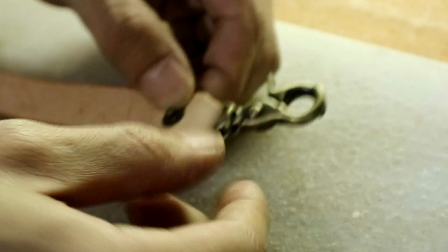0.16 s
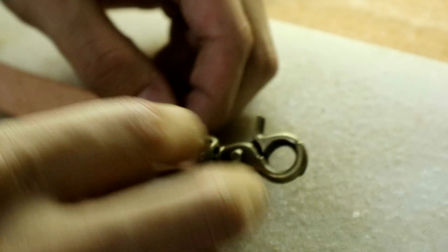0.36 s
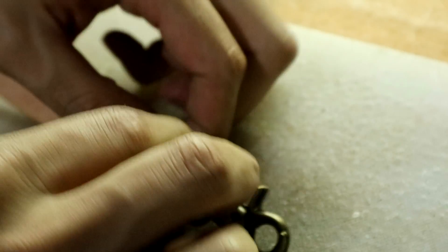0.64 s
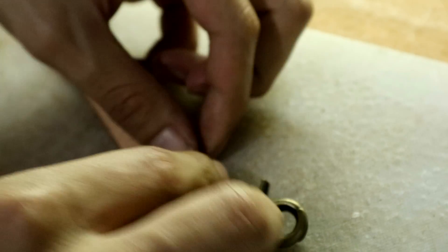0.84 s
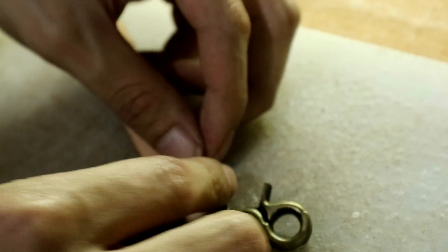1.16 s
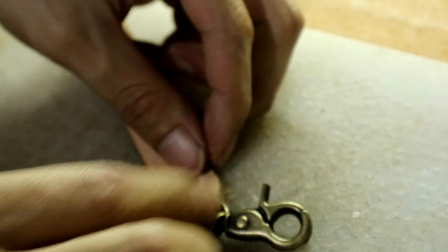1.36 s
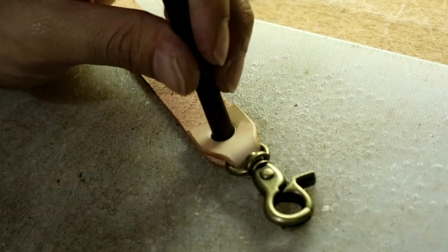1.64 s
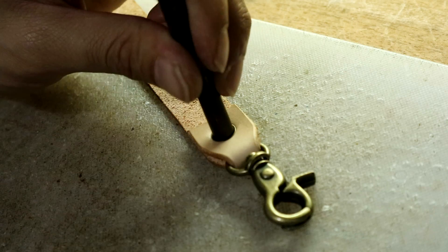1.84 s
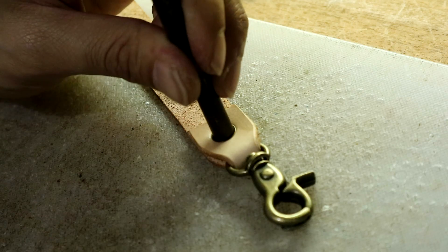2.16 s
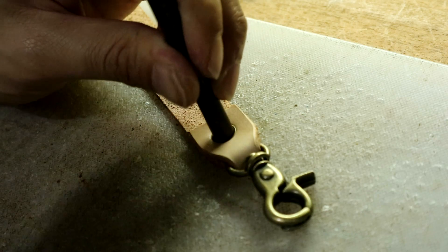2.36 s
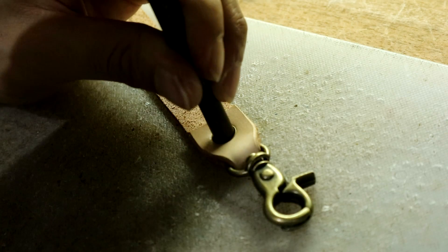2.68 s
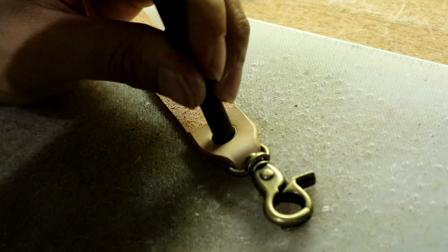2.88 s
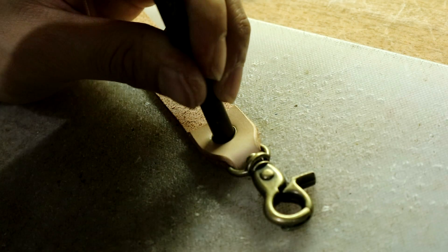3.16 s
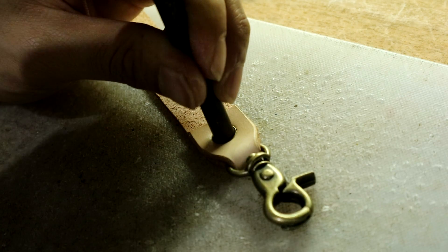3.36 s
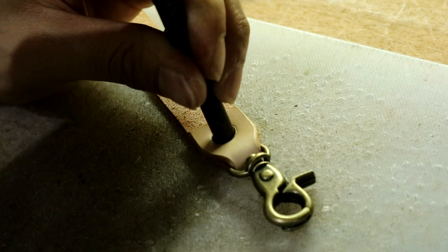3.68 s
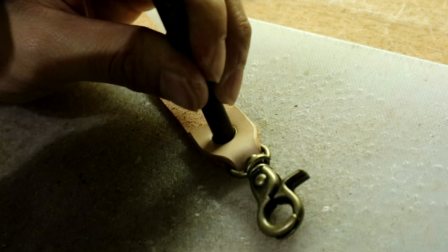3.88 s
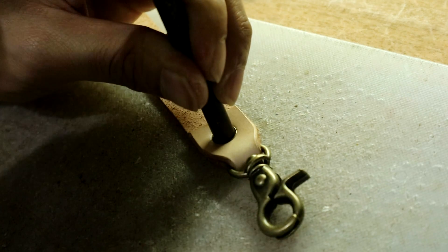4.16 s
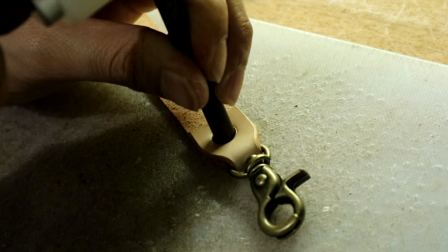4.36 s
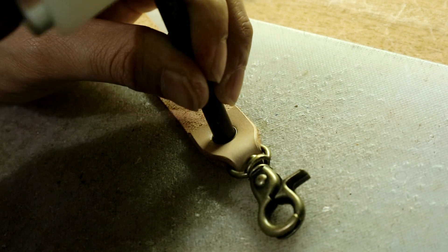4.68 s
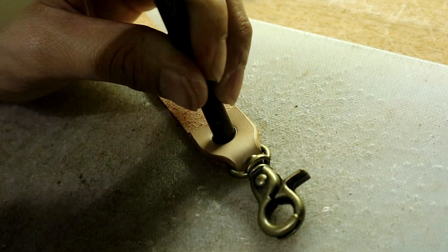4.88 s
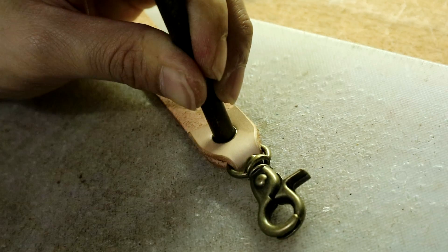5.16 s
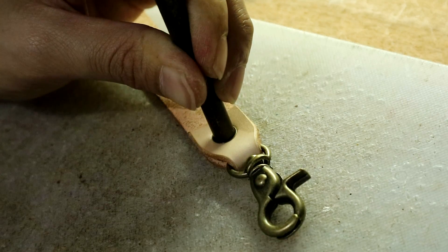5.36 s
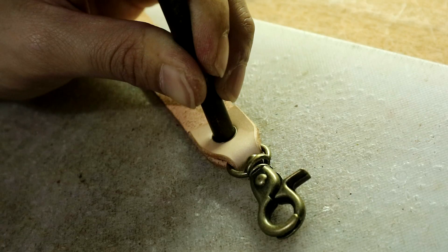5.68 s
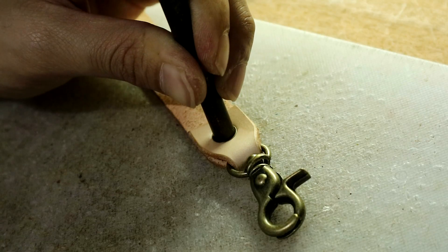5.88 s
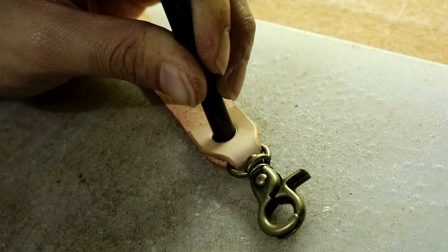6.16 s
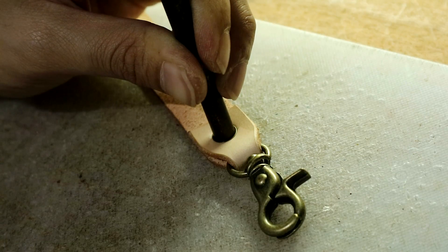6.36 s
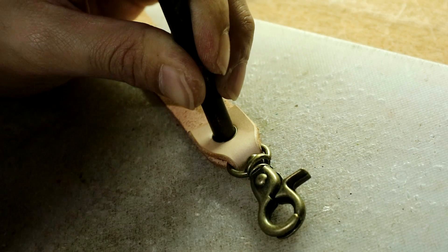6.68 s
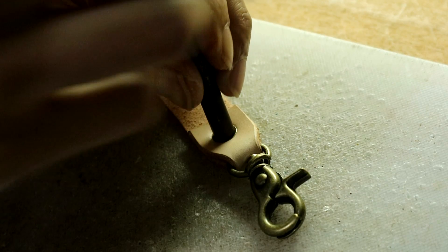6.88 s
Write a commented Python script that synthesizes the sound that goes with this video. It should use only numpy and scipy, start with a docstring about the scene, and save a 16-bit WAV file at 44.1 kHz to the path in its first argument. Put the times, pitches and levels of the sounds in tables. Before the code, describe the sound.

Close stereo camera microphones catch soft leather handling, small hook clinks and one crisp rivet snap, with quick faint focus ticking and a few tiny squeaks over low room air. Three evenly spaced, short, hard mallet blows on steel follow, loud enough to overload, echoing in the workshop. Two duller, rattling wooden thuds come as the mallet is laid on the bench, the second heavier, and hands rustle to the end.

```python
"""Reverberant workshop: a rivet snaps into a leather strap on a cutting board, a mallet strikes a steel
setter three times, then is laid on the wooden bench with two bouncing thuds. Contacts ring decaying modes
and spray short hiss into reflections and a room tail; a hook clinks, squeaks are runs of slips, hands rustle
as lumpy noise, a focus motor ticks, air and hums lie below. Two close microphones on a camera overload on
the blows; gain control recovers slowly."""
import sys
import numpy as np
from scipy import signal
from scipy.io import wavfile

SR = 44100
rng = np.random.default_rng(int(sys.argv[2]) if len(sys.argv) > 2 else 0)


def digitize_waveform(pressure):
    """Quantize a signal to 16-bit integers and store it at the path in sys.argv[1].

    Rows of a 2-D input are taken as channels; values are limited to [-1, 1].
    """
    field = np.atleast_2d(pressure).T
    bounded = np.clip(field, -1, 1)
    quanta = np.round(bounded * 32767).astype(np.int16)
    wavfile.write(sys.argv[1], SR, quanta)


N = 309493

# Room tone density: f/Hz, relative level/dB per Hz
AIR_SPECTRUM = [(15, -57), (25, -26), (113, -5.5), (173, 4), (198, -0.5), (349, 1.5), (378, -1),
                (762, -4.5), (1950, -14), (2420, -15.5), (2770, -18.5), (3090, -18), (10600, -32),
                (15500, -59)]
AIR_LEVEL_DB = -56.5
# Room tone left-right likeness: f/Hz, likeness (-1..1)
AIR_LIKENESS = [(60, 1), (180, -0.9), (550, -0.67), (1650, 0.12), (4970, -0.35), (15000, -0.53)]
# Hums that swell and fade: middle t/s, half length/s, f/Hz, level/dB
HUMS = [(.1, .3, 107, -68), (0.697, 0.27, 108, -62.5), (1.4, 0.14, 103, -74), (2.75, .13, 66, -74),
        (5.2, 0.28, 105, -67.5), (5.45, 0.23, 68, -66.5), (5.55, 0.27, 168, -61.5), (6.602, .5, 66, -66.5),
        (6.75, 0.35, 160, -60.5)]
# Hands and leather sliding, one list per stretch: t/s, level/dB
RUSTLE_LEVELS = [
    [(0, -63.5), (.45, -67.5), (.61, -51), (.79, -49), (.83, -39.5), (.9, -50.5), (1.25, -59), (1.38, -52),
     (1.49, -51), (1.53, -47), (1.59, -47)],
    [(2.82, -80), (2.93, -67.5), (3.03, -88)],
    [(5.4, -60), (5.55, -59), (5.65, -53)],
    [(6.3, -50), (6.6, -46.5), (6.84, -48.5), (7.02, -48.5)],
]
# Treble lift of each stretch: lift/dB
RUSTLE_TREBLE_LIFT_DB = [-3.5, 16, -8, -4.5]
# Rustle density: f/Hz, relative level/dB per Hz
RUSTLE_SPECTRUM = [(40, -45), (70, -52), (105, 0.5), (150, -9.5), (260, 1), (500, -2), (800, -3.5),
                   (1300, -9), (3000, -18.5), (5000, -20), (15000, -53.5)]
# Focus motor runs: first step t/s, end t/s, level/dB
MOTOR_RUNS = [(.0467, .53, -56.5), (.9267, 1.42, -57.5), (1.687, 2.78, -56), (3.247, 3.26, -54)]
STEP_S, LEAD_S, LEAD_DB, STEP_SPREAD_DB = 0.12, 0.039, -3.5, 3   # a weaker tick leads each step
# Motor modes: f/Hz, level/dB, t60/s
MOTOR_MODES = [(3025, 7.5, 0.031), (3620, 8, .008), (4330, 6.5, 0.026)]
# Snap hook clinks: t/s, level/dB
HOOK_CLINKS = [(0.0114, -55), (0.1665, -70), (0.3566, -69), (0.7277, -64), (0.7711, -59), (0.8248, -50.5),
               (0.8759, -64), (1.3087, -53), (1.325, -56), (1.345, -61), (2.9002, -68), (2.9254, -62.5)]
# Hook modes: f/Hz, level/dB, t60/s
HOOK_MODES = [(4460, 6, .012), (6670, 5, 0.0121), (8400, 5.5, 0.044), (9000, -4.5, 0.017),
              (9570, -7, 0.019), (11500, -11, .015)]
# Rivet cap snapping on, small knocks on the strap: t/s, level/dB, contact cut-off f/Hz
RIVET_SNAPS = [(0.6196, -8.5, 3040), (.648, -21.5, 1637), (.812, -35, 2000), (0.8244, -26, 2500),
               (2.926, -42.5, 2950)]
# Strap-on-board modes: f/Hz, level/dB, t60/s
STRAP_MODES = [(321.8, -14, 0.05), (767, 0, 0.036), (1105, 6.5, 0.012), (1326, 11, 0.0067),
               (1960, 2.5, 0.014), (2500, -2, 0.0067), (2990, -7, 0.0098), (3430, -3, .012),
               (4124, 5.5, 0.0048)]
# Faint squeaks: t/s, length/s, strongest slip level/dB
SQUEAK_RUNS = [(2.005, 0.049, -57.5), (2.264, 0.057, -59.5), (2.904, .085, -63), (4.972, 0.0039, -45)]
SLIP_GAP_S = 0.007   # mean
# Squeak modes: f/Hz, level/dB, t60/s
SQUEAK_MODES = [(2250, -4.5, .02), (2400, -1, .03), (2460, -3.5, 0.023), (4500, -13, 0.018)]
# Three mallet blows (first three rows); a light bounce after the second and after the third:
# t/s, level/dB, contact cut-off f/Hz
MALLET_BLOWS = [(3.4268, 4.5, 4500), (3.8021, 7.5, 4000), (4.2253, 8, 3600), (3.832, -15, 3000),
                (4.266, -16.5, 6000)]
# Setter and board modes: f/Hz, level/dB, t60/s
SETTER_MODES = [(150, -16, 0.067), (268, -8, 0.045), (370, -6, 0.021), (540.3, -10.5, 0.027),
                (805, -5.5, 0.018), (977, -5.5, 0.012), (1194, -3.5, 0.017), (1425, -3.5, 0.014),
                (1715, 0, .014), (2244, -6.5, 0.02), (2717, -8, 0.01), (3200, -15, 0.016),
                (4006, -17, 0.018), (5300, -11, .003)]
# Mallet laid down: t/s, level/dB, contact cut-off f/Hz, spray level/dB, rebound gap/s, loss per rebound/dB
MALLET_THUDS = [(5.6529, -10.5, 820, -25, .019, 16), (5.690, -15.5, 786, -25, .0205, 3),
                (5.835, -29.5, 900, -24, .016, 4), (6.021, -6.5, 654, -15.5, .0165, 2),
                (6.083, 4, 1624, -18, .014, 9.5)]
REBOUND_CUTOFF_FACTOR, REBOUND_SPRAY_LOSS_DB = 0.79, 11.5   # factor per rebound; loss same for all
# Bench modes: f/Hz, level/dB, t60/s
BENCH_MODES = [(99, -11, 0.05), (153.8, -20.5, 0.32), (251, -2.5, 0.11), (336, -4.5, 0.064), (387, 0, 0.05),
               (427.3, 0, 0.062), (482, 1.5, 0.068), (682, 0.5, 0.025), (843, -13.5, 0.052),
               (854, -13, 0.039), (1080, 6.5, 0.025), (1335, -3.5, 0.031), (1624, 0, 0.021),
               (1970, -19, 0.016), (2448, -7.5, .04)]
# First reflections, left-right likeness: f/Hz, likeness (-1..1)
NEAR_LIKENESS = [(60, 0.81), (500, 0.3), (2000, -.4), (12000, -0.6)]
# Room tail density: f/Hz, relative level/dB per Hz
ROOM_SPECTRUM = [(40, -13), (90, 0.5), (150, 7.5), (300, 2.5), (800, 1.5), (1500, -8), (2300, -8),
                 (3000, -11), (4500, -8), (6000, -7), (15000, -6.5)]
# Room tail left-right likeness: f/Hz, likeness (-1..1)
ROOM_LIKENESS = [(60, .85), (300, .5), (640, .35), (1400, .1), (3000, -.1), (12000, -.2)]
# Room tail decay: f/Hz, t60/s
ROOM_DECAY = [(60, 0.83), (160, 0.97), (420, 0.83), (1100, 0.95), (2910, 0.88), (5000, .6), (7680, 0.42),
              (12000, .2)]
# Standing waves in the room tail: f/Hz, level/dB, t60/s
STANDING_WAVES = [(105, -13, .8), (146.6, -11, .85), (258, -25, .7), (312, -14.5, 0.56), (417, -18, .7),
                  (744.7, -19, 0.81), (807, -21, .7), (993, -23, .7)]
# Share of the excess over the knee that is turned down; fall of the held level; clip ceiling; top cut
GAIN_SHARE, HELD_FALL_DB_PER_S, OVERLOAD_PEAK, CUTOFF_HZ = 0.45, 7, 1.0, 16300


def amp(db):
    """dB to gain."""
    return np.exp(np.asarray(db) * (np.log(10) / 20))


def rms_one(x):
    """Scale to rms 1."""
    return x / np.sqrt(np.mean(x ** 2) + 1e-30)


def in_time(rows):
    """Level curve per sample; silent outside its span."""
    time_s, level_db = np.transpose(rows)
    return np.interp(np.arange(N) / SR, time_s, level_db, left=-200, right=-200)


def at_hz(points, hz):
    """Read a table on a log-frequency axis."""
    table_hz, values = np.transpose(points)
    return np.interp(np.log(hz), np.log(table_hz), values)


def drift(rate_hz):
    """Slow random curve of rms 1: low-passed noise on a grid of 40 samples."""
    r = np.exp(-2 * np.pi * rate_hz * 40 / SR)
    noise = rng.standard_normal(N // 40 + 2002)
    slow = signal.lfilter([1], [1, -2 * r, r * r], noise)[2000:]   # drop the run-in
    return np.interp(np.arange(N) / 40, np.arange(len(slow)), rms_one(slow))


def bands(white, spectrum, likeness, shape):
    """Third-octave stereo noise, each band with its level, likeness and shape in time; rms 1 overall."""
    out = 0
    edges_hz = 25 * 2 ** (np.arange(29) / 3)
    for k, (low, high) in enumerate(zip(edges_hz, edges_hz[1:])):
        band = signal.butter(2, [low, high], "band", fs=SR, output="sos")
        mid, side = signal.sosfilt(band, white[k % 2])   # neighbours use different noise
        hz = np.sqrt(low * high)
        alike = np.clip(at_hz(likeness, hz), -1, 1)
        stereo = np.sqrt(1 + alike) * mid + np.sqrt(1 - alike) * side * [[1], [-1]]
        out = out + amp(at_hz(spectrum, hz)) * shape(hz) * stereo
    return rms_one(out)


def struck(events, modes, seconds=0.39, rise_cycles=0.79, crack_s=0.004, spray_s=0.0053,
           spray_hz=(2200, 5500), click_db=0.0):
    """Contacts ring body modes and spray hiss; a low contact cut-off rises slowly and stays dull.

    Events: t/s, ring peak/dB, cut-off f/Hz, spray/dB. Returns whole ring; first crack with a click."""
    out = np.zeros((2, N + SR))
    t = np.arange(round(seconds * SR)) / SR
    hz, level_db, t60_s = np.transpose(modes)[:, :, None]
    signs = (-1.) ** np.arange(len(modes))[:, None]   # neighbouring modes start in opposite directions
    vary_db = 2 * rng.standard_normal((len(events), len(modes), 1))

    colour = np.vstack([signal.butter(1, spray_hz[0], "high", fs=SR, output="sos"),
                        signal.butter(3, spray_hz[1], fs=SR, output="sos")])
    hiss = signal.sosfilt(colour, rng.standard_normal((len(events), len(t))))
    spray_shape = t / spray_s * np.exp(1 - 2 * t / spray_s)
    click = signal.sosfilt(colour, t == 0) * np.sqrt(spray_s * SR / 2) * amp(click_db)

    for (start_s, peak_db, cut_hz, spray_db), vary, noise in zip(events, vary_db, hiss):
        decay = amp(level_db + vary - 60 * t / np.abs(t60_s))
        ring = np.sum(signs * decay * np.sin(2 * np.pi * hz * t), axis=0)
        cut_hz = np.clip(cut_hz, 100, 18000)
        ring = ring * (1 - np.exp(-t * cut_hz / rise_cycles))
        ring = signal.sosfilt(signal.butter(3, cut_hz, fs=SR, output="sos"), ring)
        ring = ring / np.abs(ring).max()
        whole = ring + amp(spray_db) * noise * spray_shape
        crack = ring * np.exp(-t / crack_s) + amp(spray_db) * click
        at = round(start_s * SR)
        out[:, at:at + len(t)] += amp(peak_db) * np.array([whole, crack])
    return out[:, :N]


def contacts(rows, cut_hz, spray_db):
    """Rows of t/s, level/dB that share one hardness and spray."""
    return [(time_s, db, cut_hz, spray_db) for time_s, db in rows]


def room_tone():
    """Continuous air noise with slightly flickering bands, partly unlike left and right."""
    def flicker(hz):
        return amp(0.6 * drift(6))

    return amp(AIR_LEVEL_DB) * bands(rng.standard_normal((2, 2, N)), AIR_SPECTRUM, AIR_LIKENESS, flicker)


def hum(waver=0.013, flutter_db=3.5):
    """Low tones that swell in a bell shape and waver in pitch and strength."""
    t = np.arange(N) / SR
    warped_s = np.cumsum(1 + waver * drift(3)) / SR
    tones = 0
    for mid_s, half_s, hz, db in HUMS:
        swell = np.exp(-((t - mid_s) / half_s) ** 2)
        tones = tones + amp(db) * swell * np.sin(2 * np.pi * hz * warped_s)
    return amp(flutter_db * drift(5)) * tones


def rustle():
    """Sliding skin and leather: lumpy noise, treble lifted or lowered per stretch."""
    level_db = np.array([in_time(rows) for rows in RUSTLE_LEVELS])
    lift_db = np.array(RUSTLE_TREBLE_LIFT_DB)[level_db.argmax(axis=0)]
    lumps_db = 2 * drift(40)
    lift_share = [(1000, 0), (4000, 1)]   # f/Hz, share of the lift
    likeness = [(60, 0.98), (1000, 0.0), (10000, 0.056)]   # f/Hz, likeness

    def shape(hz):
        return amp(lumps_db + drift(20.5) + at_hz(lift_share, hz) * lift_db)

    noise = bands(rng.standard_normal((2, 2, N)), RUSTLE_SPECTRUM, likeness, shape)
    return amp(level_db.max(axis=0)) * noise


def motor_steps():
    """Steady step times with lead ticks; levels scatter."""
    rows = []
    for first_s, end_s, db in MOTOR_RUNS:
        for step_s in np.arange(first_s, end_s, STEP_S):
            rows += [(step_s, db), (step_s - LEAD_S, db + LEAD_DB)]
    return [(time_s, db + STEP_SPREAD_DB * rng.standard_normal()) for time_s, db in rows]


def focus_motor():
    """Each step or lead tick rings the motor's short modes; no crack, no room."""
    events = contacts(motor_steps(), cut_hz=7400, spray_db=-6)
    return struck(events, MOTOR_MODES, seconds=0.08, spray_s=0.003, spray_hz=(2800, 4800))[0]


def hook_clinks():
    """Hard contacts ring the hook's high modes."""
    events = contacts(HOOK_CLINKS, cut_hz=12000, spray_db=4)
    return struck(events, HOOK_MODES, seconds=0.08, spray_hz=(3500, 10000))


def rivet_snaps():
    """Cap and strap contacts ring the strap on its board."""
    events = [(*row, -17) for row in RIVET_SNAPS]
    return struck(events, STRAP_MODES, crack_s=0.0018, spray_hz=(1700, 3600), click_db=3.0)


def slips():
    """Unevenly spaced slips of uneven strength, the first at the squeak's start."""
    rows = []
    for start_s, length_s, db in SQUEAK_RUNS:
        gap_luck, level_luck = rng.random((2, 40))
        gaps_s = 2 * SLIP_GAP_S * gap_luck
        after_s = np.cumsum(gaps_s) - gaps_s[0]
        rows += [(start_s + a, db - 6 * u) for a, u in zip(after_s, level_luck) if a < length_s]
    return rows


def squeaks():
    """Runs of small slips, each ringing short modes."""
    events = contacts(slips(), cut_hz=6000, spray_db=-3)
    return struck(events, SQUEAK_MODES, seconds=0.08, crack_s=0.01)


def mallet_blows():
    """Mallet contacts ring the steel setter and board."""
    events = [(*row, -11.5) for row in MALLET_BLOWS]
    return struck(events, SETTER_MODES, crack_s=0.0033, spray_s=0.0054, spray_hz=(2300, 4600))


def rebounds(count=7):
    """Each thud rocks on in duller touches, weaker on average, until the next thud."""
    rows = []
    stops_s = [row[0] for row in MALLET_THUDS[1:]] + [N / SR]
    for (start_s, db, cut_hz, spray_db, gap_s, loss_db), stop_s in zip(MALLET_THUDS, stops_s):
        rows.append((start_s, db, cut_hz, spray_db))
        luck_db = 1.5 * rng.standard_normal(count)
        for k in range(1, count):
            if start_s + gap_s * (k + 0.5) < stop_s:
                rows.append((start_s + gap_s * k, db - loss_db * k + luck_db[k],
                             cut_hz * REBOUND_CUTOFF_FACTOR ** k, spray_db - REBOUND_SPRAY_LOSS_DB))
    return rows


def mallet_thuds():
    """Soft contacts and rebounds ring the wooden bench."""
    return struck(rebounds(), BENCH_MODES, crack_s=0.0056, spray_s=0.0045, spray_hz=(1500, 2700),
                  click_db=5.5)


def echoes(spectrum, likeness, t60_at, start_s, seconds):
    """Stereo impulse response: noise that builds up, then dies band by band; unit energy per channel."""
    t = np.arange(round(seconds * SR)) / SR
    rise = np.clip(t / start_s, 0, 1) ** 2
    tail = bands(rng.standard_normal((2, 2, len(t))), spectrum, likeness,
                 lambda hz: rise * amp(-60 * t / t60_at(hz)))
    return tail / np.sqrt(len(t))


def standing_waves(size, build_s=0.015):
    """Room modes build up, then die; each row's dB sets its energy."""
    t = np.arange(size) / SR
    hz, level_db, t60_s = np.transpose(STANDING_WAVES)[:, :, None]
    waves = (1 - np.exp(-t / build_s)) * amp(-60 * t / t60_s) * np.sin(2 * np.pi * hz * t)
    waves = waves / np.sqrt(np.sum(waves ** 2, axis=1, keepdims=True))
    return np.sum(amp(level_db) * waves, axis=0)


def workshop(ring, crack, near_db=-1.5, room_db=-5.5, near_t60_s=0.061, near_start_s=0.0014,
             room_start_s=0.012):
    """Direct ring plus its quick reflections off board and hands; the crack feeds the long room tail."""
    near_spectrum = [(50, 0.00064), (1000, 0), (15000, 0.0013)]   # f/Hz, level/dB per Hz
    near = echoes(near_spectrum, NEAR_LIKENESS, lambda hz: near_t60_s, near_start_s, 0.11)
    room = echoes(ROOM_SPECTRUM, ROOM_LIKENESS, lambda hz: at_hz(ROOM_DECAY, hz), room_start_s, 1.4)
    room = room + standing_waves(size=room.shape[1])
    direct = ring * amp([[-0.4], [0.4]])   # right slightly louder
    reflections = signal.fftconvolve(ring[None], amp(near_db) * near, axes=1)[:, :N]
    tail = signal.fftconvolve(crack[None], amp(room_db) * room, axes=1)[:, :N]
    return direct + reflections + tail


def scene():
    """Contacts go through the room; the other layers reach the microphones directly."""
    bench = hook_clinks() + rivet_snaps() + squeaks() + mallet_blows() + mallet_thuds()
    bass_cut = signal.butter(4, 85, "high", fs=SR, output="sos")   # small bodies radiate no deep bass
    in_room = signal.sosfilt(bass_cut, workshop(*bench))
    return in_room + room_tone() + hum() + rustle() + focus_motor()


def record(dry, knee_db=-34, smooth_s=0.03, hardness=6.0):
    """Gain control turns loud sound down and lets go slowly; peaks overload; the top is cut."""
    fall_db = HELD_FALL_DB_PER_S * np.arange(N) / SR
    power = np.mean(np.minimum(dry ** 2, 1), axis=0)
    power = signal.lfilter([1 / 2048], [1, 1 / 2048 - 1], power)   # time constant 2048 samples
    held_db = np.maximum.accumulate(10 * np.log10(power + 1e-14) + fall_db) - fall_db
    cut_db = GAIN_SHARE * np.maximum(held_db - knee_db, 0)
    r = np.exp(-1 / (smooth_s * SR))
    x = dry * amp(-signal.lfilter([1 - r], [1, -r], cut_db))
    x = x / (1 + np.abs(x / OVERLOAD_PEAK) ** hardness) ** (1 / hardness)
    return signal.sosfilt(signal.cheby2(12, 70, CUTOFF_HZ, fs=SR, output="sos"), x)


dry = scene()
out = record(dry)
digitize_waveform(out)
```